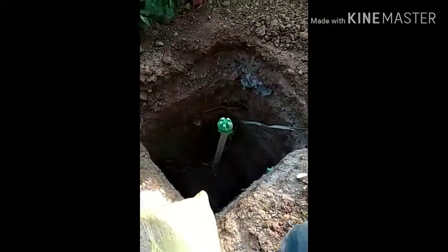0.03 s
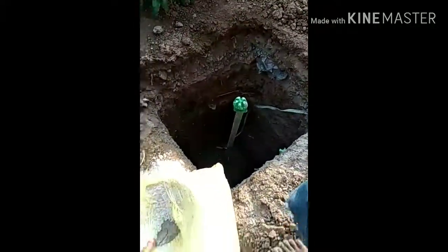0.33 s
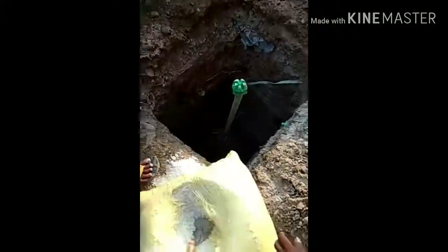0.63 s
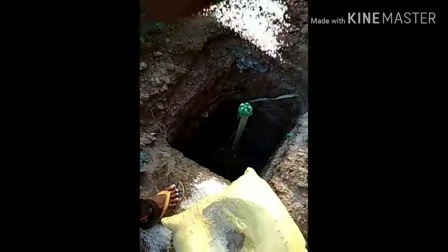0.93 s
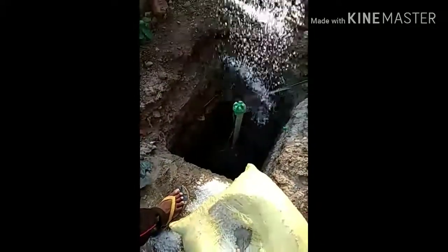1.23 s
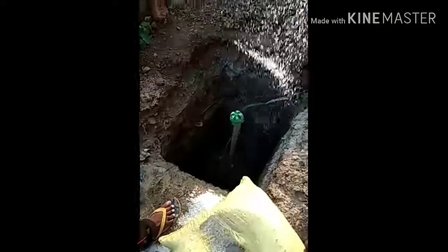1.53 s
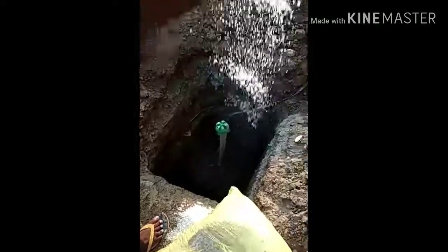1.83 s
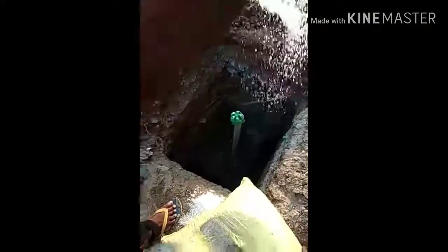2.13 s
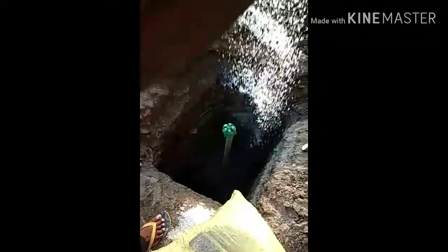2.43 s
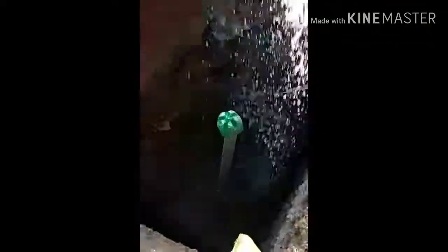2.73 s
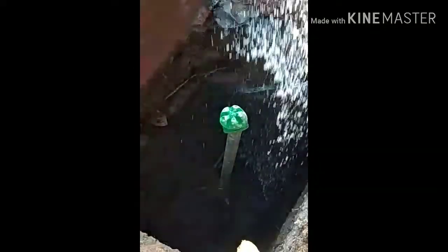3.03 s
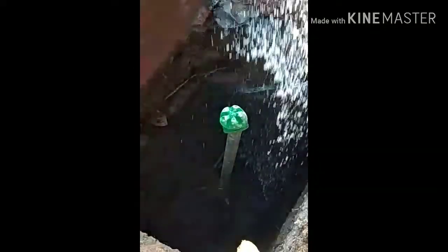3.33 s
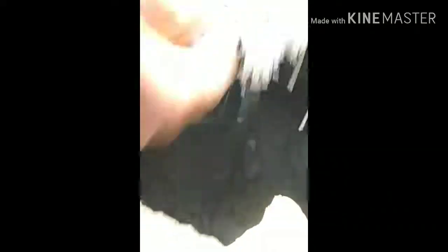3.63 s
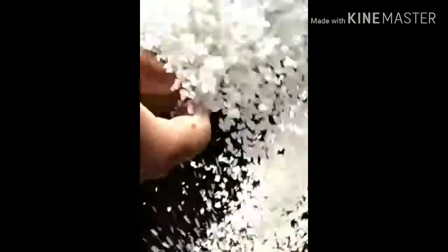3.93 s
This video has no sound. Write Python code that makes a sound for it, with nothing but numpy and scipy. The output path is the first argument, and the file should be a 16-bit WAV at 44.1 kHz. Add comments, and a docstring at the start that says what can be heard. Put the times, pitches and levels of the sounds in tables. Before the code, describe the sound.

A hand scatters dry granules into an earth pit with rapid, rattling sprays and wind rumble.

```python
"""An earth pit in the open air: close to a phone, a hand shakes out dry granules about six times a second.
Each shake rattles the grains in the hollow of the hand, sprays them out with a hiss and patters on soil.
Loose grains trickle between shakes, and a few click close by. Puffs of air buffet the two microphone
ports, and a few dull low thumps come from wind puffs or handling."""
import sys
import numpy as np
from scipy import signal
from scipy.fft import rfft, irfft
from scipy.io import wavfile
from scipy.ndimage import uniform_filter1d, map_coordinates

SR = 44100
rng = np.random.default_rng(int(sys.argv[2]) if len(sys.argv) > 2 else 0)


def int16_out(signal):
    """Quantize to a 16-bit WAV file."""
    q = np.round(np.clip(np.atleast_2d(signal).T, -1, 1) * 32767)
    wavfile.write(sys.argv[1], SR, q.astype(np.int16))


N = 176400

# Tone of each layer: (frequency [Hz], relative level [dB])
AIR_TONE = [(40, -1.5), (500, -21), (8000, -32)]
EDDY_TONE = [(12, -2.5), (35, 4), (100, -13), (160, -17.5), (400, -48), (2000, -61.5)]
FLUTTER_TONE = [(70, -10), (125, 6.5), (200, -3.5), (290, -12.5), (420, -26.5), (1500, -51.5)]
TRICKLE_TONE = [(400, -20.5), (1800, -14), (7000, -5.5), (10500, -2.5), (16000, -2.5)]
PATTER_TONE = [(150, -11.5), (370, 9), (500, 9), (900, 12.5), (1350, 19.5), (2000, -3), (4000, -57)]
RATTLE_TONE = [(500, -37), (1200, -11.5), (1550, -6.5), (2000, -8), (3700, -2), (4600, -17), (16000, -29)]
HISS_TONE = [(800, -14.5), (2500, -16.5), (4200, -1.5), (6500, -0.5), (10500, 3.5), (16000, -0.5)]
# Air moving past the ports: (time [s], left level [dB], right level [dB])
BREEZE = [(0, -23.5, -27), (.25, -27, -18), (.6, -21.5, -30), (.76, -30, -32), (1.12, -38.5, -33),
          (1.4, -35, -33.5), (2.65, -38.5, -38), (2.95, -44.5, -44.5), (3.55, -43, -36), (4, -32, -35)]
# Puffs that hit a port: (peak time [s], half-length [s], level [dB], port [0 left, 1 right])
PUFFS = [(0.023, 0.014, -15, 0), (0.092, 0.029, -16.5, 0), (0.532, 0.039, -18, 0), (0.679, 0.017, -18, 0),
         (0.933, 0.043, -20, 0), (0.265, 0.0066, -15.5, 1), (0.32, 0.021, -16, 1), (0.569, 0.025, -10, 1),
         (2.029, 0.027, -24.5, 1), (2.615, 0.12, -26.5, 1), (3.308, 0.063, -25.5, 1),
         (4.0, 0.054, -14.5, 1)]
# Low thumps from wind puffs or handling: (time [s], level [dB], port [0 left, 1 right])
THUMPS = [(.79, -19, 0), (0.859, -17, 1), (0.905, -23, 0), (1.202, -13, 1), (2.529, -15.5, 1)]
# Lone grains and crumbs: (time [s], level [dB], pitch [Hz])
TICKS = [(.829, -24, 11600), (1.053, -32, 900), (1.949, -29, 900), (3.705, -22, 8840)]
# Bed of sliding grains: (time [s], level [dB])
TRICKLE_LEVEL = [(0, -31), (.26, -33), (.48, -40), (.65, -45), (.8, -37), (1.22, -36), (1.58, -31.5),
                 (1.75, -26.5), (2.45, -25.5), (2.85, -27), (3.1, -26.5), (3.35, -32), (4, -25)]
# Throws of the hand: (peak time [s], hiss level [dB], rattle level [dB], patter level [dB])
SHAKES = [(.995, -36, -37, -52), (1.142, -28, -31.5, -45.5), (1.317, -25, -31, -47),
          (1.494, -24, -30.5, -43.5), (1.659, -25, -32, -40), (1.746, -25.5, -32, -39.5),
          (1.832, -24, -28, -49), (1.96, -29, -33, -40), (2.02, -21, -26, -62), (2.19, -24.5, -31, -49),
          (2.289, -32, -32.5, -56), (2.364, -24, -30, -50), (2.484, -25, -30, -65),
          (2.581, -17.5, -26, -50), (2.753, -21, -28.5, -43.5), (2.974, -27, -67, -43),
          (3.117, -40, -35, -38), (3.348, -30.5, -45, -43.5), (3.713, -22, -31, -48),
          (3.82, -23, -28.5, -51), (3.893, -20, -27, -38)]
# Swings that keep the grains in the hand: (peak time [s], rattle level [dB])
SWINGS = [(.735, -45), (0.807, -38.5), (.925, -38.5), (1.08, -39), (1.255, -36), (1.43, -37),
          (1.575, -37.5), (2.125, -36.5), (2.67, -34), (3.646, -33.5), (3.98, -30)]
# Ring of the hollow against the rattle as the hand nears the phone: (time [s], level [dB])
HOLLOW_LEVEL = [(.8, -13.5), (1.3, -25), (3.55, -20), (3.8, -9)]
# Ring of the rattle, shifting with the grip: (time [s], pitch [Hz])
RATTLE_PITCH = [(1.2, 2144), (1.83, 2020), (2.02, 2480), (2.3, 2060), (2.7, 2410), (3.7, 3130),
                (3.82, 2140)]
# Side that the spray is on: (time [s], left minus right [dB])
SPRAY_PAN = [(0, -2.5), (1.15, -8), (1.75, -3), (2.75, -4.5), (2.9, 0), (3.9, -1.5)]
# Tone difference of the ports: (frequency [Hz], left minus right [dB])
PORT_COLOUR = [(3500, 0), (5200, 4.5), (7200, 5), (11000, -2.5), (15000, -.5)]

SHAKE_HALF_S, SPRAY_HALF_S = .029, .023
ECHO_LAGS_S, ECHO_DRIFT, ECHO_GAIN = (.0004, .0011, .0031, .0058), .06, .36


def undb(db):
    """Decibels to gain."""
    return 10 ** (np.asarray(db) / 20)


def unit(x):
    """Scale to rms 1."""
    return x / np.sqrt(np.mean(x ** 2))


def pan(db):
    """Left and right gains for a level difference."""
    return undb(np.array([[.5], [-.5]]) * db)


def curve(rows, column=1):
    """Automation: one column of a table, joined by straight lines in time."""
    rows = np.array(rows)
    return np.interp(np.arange(N) / SR, rows[:, 0], rows[:, column])


def walk(per_s):
    """Smooth random wander, spread near 1."""
    hold = int(SR / per_s)
    steps = rng.standard_normal(1000)[np.arange(N) // hold]
    return 1.3 * uniform_filter1d(uniform_filter1d(steps, hold), hold)


def swell(peak_s, half_s, shape=1.8):
    """A rounded attack and a somewhat quicker release."""
    t = np.arange(N) / SR - peak_s
    width = half_s * np.where(t < 0, 1.1, .85)
    return np.exp(-.5 * np.abs(t / width) ** shape)


def envelope(rows, half_s, column=1):
    """One swell per row at that column's level, summed in power."""
    return np.sqrt(sum((undb(row[column]) * swell(row[0], half_s)) ** 2 for row in rows))


def colour(x, tone):
    """Minimum-phase EQ along a tone table; result has rms 1."""
    hz, db = np.array(tone).T
    bins_hz = np.maximum(np.fft.rfftfreq(N, 1 / SR), 1)
    gain = undb(np.interp(np.log(bins_hz), np.log(hz), db))
    cepstrum = irfft(np.log(gain), N)
    cepstrum[1:N // 2] *= 2
    cepstrum[N // 2 + 1:] = 0
    return unit(irfft(rfft(x) * np.exp(rfft(cepstrum)), N))


def ring(x, hz, width_hz):
    """One resonance; result has rms 1."""
    return unit(signal.lfilter(*signal.iirpeak(hz, hz / width_hz, fs=SR), x))


def gliding_ring(x, hz, half_width_hz):
    """A resonance whose centre moves; result has rms 1."""
    turn = np.exp(2j * np.pi * np.cumsum(hz) / SR)
    return unit(np.real(turn * signal.lfilter(*signal.butter(2, half_width_hz, fs=SR), x / turn)))


def grains(per_s, scatter_db, shared, port_lag_s=.00039):
    """Random collisions of uneven size; a share reaches both ports, the right one first."""
    size = (3, N)  # left only, right only, both
    hits = (rng.random(size) < per_s / SR) * np.sign(rng.standard_normal(size))
    hits *= undb(scatter_db * np.minimum(rng.exponential(size=size), 5))
    n = np.arange(N)
    late = np.interp(n - round(port_lag_s * SR), n, hits[2])
    return np.sqrt(1 - shared) * hits[:2] + np.sqrt(shared) * np.array([late, hits[2]])


def clumps(depth_db=3):
    """Grains leave in clumps, so their level flickers."""
    flow = walk(per_s=41)
    return undb(depth_db * (flow - uniform_filter1d(flow, size=2000)))


def reflections(x):
    """Hand, arm and ground throw back short echoes whose paths change as the hand moves; rms 1."""
    channels = []
    for port in x:
        delays = [lag * SR * (1 + ECHO_DRIFT * walk(per_s=4)) for lag in ECHO_LAGS_S]
        echoes = sum(map_coordinates(port, [np.arange(N) - delay], mode="mirror") for delay in delays)
        channels.append(port + ECHO_GAIN * echoes)
    return unit(np.array(channels))


def port_colour(x):
    """The ports face different ways, so each colours the grains in its own way."""
    hz, db = np.array(PORT_COLOUR).T
    return irfft(rfft(x) * pan(np.interp(np.fft.rfftfreq(N, 1 / SR), hz, db)), N)


def air(level_db=-47):
    """A quiet outdoor bed, almost mono."""
    return undb(level_db) * colour(rng.standard_normal(N) + .2 * rng.standard_normal((2, N)), AIR_TONE)


def wind(gust_db=3.5, flutter_db=-.5):
    """Eddies press on each port separately: an uneven rumble and flutter that swell in puffs."""
    channels = []
    for side in range(2):
        power = undb(curve(BREEZE, column=side + 1) + gust_db * walk(per_s=34)) ** 2
        power += sum((undb(db) * swell(s, half_s, shape=2.76)) ** 2
                     for s, half_s, db, port in PUFFS if port == side)
        eddies = colour(rng.standard_normal(N), EDDY_TONE)
        eddies /= np.sqrt(uniform_filter1d(uniform_filter1d(eddies ** 2, 1300), 1300))  # level out
        flutter = undb(flutter_db) * np.abs(eddies) * colour(rng.standard_normal(N), FLUTTER_TONE)
        # Flutter grows faster than rumble, so hard puffs are brighter.
        channels.append(np.sqrt(power) * eddies + power ** .89 * flutter)
    return np.array(channels)


def low_thumps(thump_hz=55.3, attack_s=.011, scuff_db=-14.5):
    """Short, dull low thumps with a scuff at one port, from wind puffs or handling."""
    out = np.zeros((2, N))
    scuff = undb(scuff_db) * colour(rng.standard_normal(N), FLUTTER_TONE)
    for s, db, port in THUMPS:
        age = np.maximum(np.arange(N) / SR - s, 0)
        pulse = age / attack_s * np.exp(1 - age / attack_s)
        out[port] += undb(db) * pulse * (np.sin(2 * np.pi * thump_hz * age) + scuff)
    return out


def ticks(decay_s=.0015):
    """Lone grains and crumbs strike near the phone with a tight, pitched click."""
    t = np.arange(N) / SR
    out = np.zeros((2, N))
    for s, db, hz in TICKS:
        decay = (t >= s) * np.exp(-np.abs(t - s) / decay_s)
        out += undb(db) * decay * ring(rng.standard_normal((2, N)), hz, width_hz=800)
    return out


def trickle():
    """Loose grains keep sliding and falling, on the spray's side but nearer the centre."""
    sliding = reflections(colour(grains(per_s=6000, scatter_db=3, shared=.06), TRICKLE_TONE))
    return undb(curve(TRICKLE_LEVEL)) * clumps() * sliding * pan(curve(SPRAY_PAN) * 2 / np.pi)


def soil_patter():
    """Thrown grains land on the soil with a coarse, dull patter."""
    impacts = grains(per_s=700, scatter_db=5.5, shared=.6)
    soil = reflections(colour(impacts, PATTER_TONE))
    return envelope(SHAKES, SHAKE_HALF_S, column=3) * soil * pan(db=2.5)


def hand_rattle(hollow_hz=812.4, wander=.019, grip_db=-8):
    """Grains collide on every throw and swing, ringing the hollow of the hand."""
    collisions = grains(per_s=4400, scatter_db=1.5, shared=.33)
    clatter = reflections(colour(collisions, RATTLE_TONE))
    hollow = gliding_ring(collisions, hollow_hz * (1 + wander * walk(per_s=10)), half_width_hz=28)
    grip = gliding_ring(collisions, curve(RATTLE_PITCH), half_width_hz=163)
    hand = unit(clatter + undb(curve(HOLLOW_LEVEL)) * hollow + undb(grip_db) * grip)
    level = np.hypot(envelope(SHAKES, SHAKE_HALF_S, column=2), envelope(SWINGS, SHAKE_HALF_S))
    return level * clumps() * hand * pan(db=2.5)


def spray(pellet_db=-8):
    """Each throw lets out a bright hiss of fine grains, with hard granules clicking out of it."""
    fine = unit(grains(per_s=9000, scatter_db=-.5, shared=.067))
    pellets = unit(grains(per_s=420, scatter_db=3, shared=.17))
    hiss = reflections(colour(fine + undb(pellet_db) * pellets, HISS_TONE))
    return envelope(SHAKES, SPRAY_HALF_S) * clumps() * hiss * pan(curve(SPRAY_PAN))


def scene():
    """Granules up front, over wind, low thumps and open air."""
    granules = spray() + hand_rattle() + soil_patter() + trickle()
    return port_colour(granules) + ticks() + wind() + low_thumps() + air()


def record(dry):
    """The phone cuts the top end steeply."""
    cutoff_hz = 15520
    hz = np.fft.rfftfreq(N, 1 / SR)
    return irfft(rfft(dry) / np.sqrt(1 + (hz / cutoff_hz) ** 700), N)


dry = scene()
out = record(dry)
int16_out(out)
```